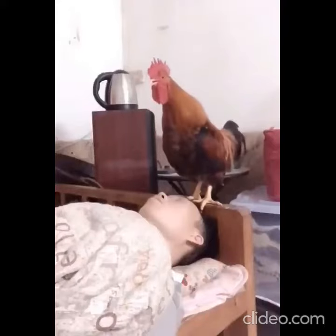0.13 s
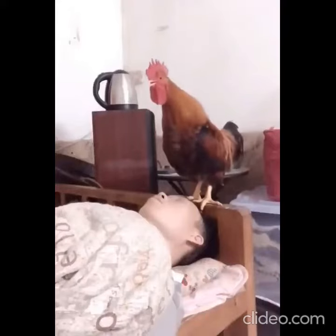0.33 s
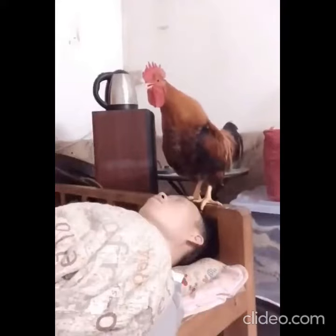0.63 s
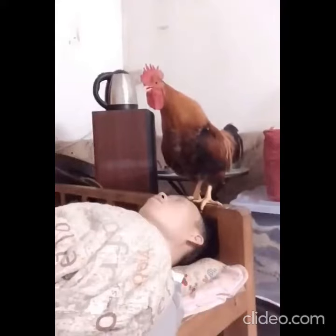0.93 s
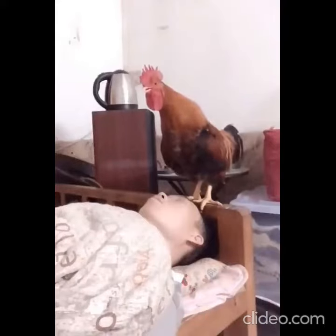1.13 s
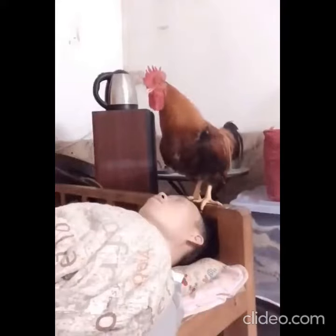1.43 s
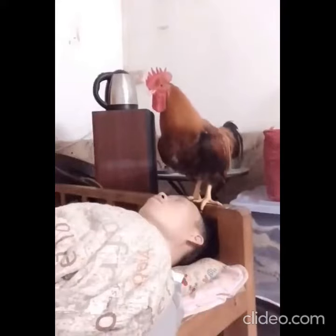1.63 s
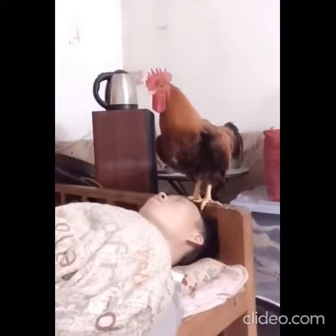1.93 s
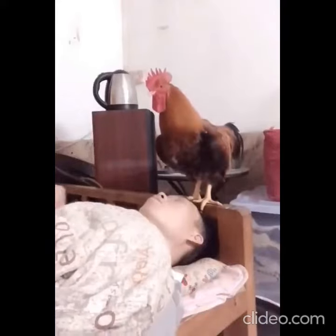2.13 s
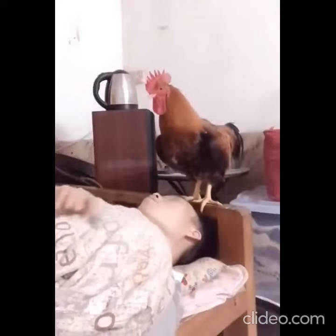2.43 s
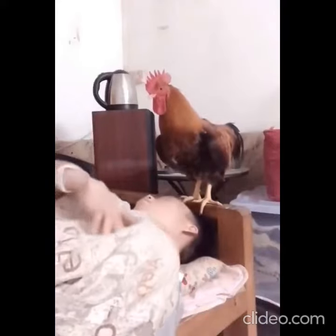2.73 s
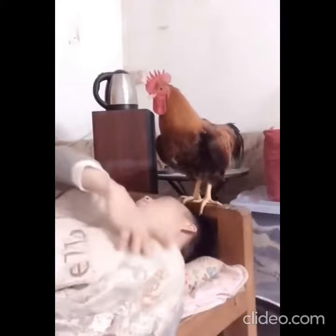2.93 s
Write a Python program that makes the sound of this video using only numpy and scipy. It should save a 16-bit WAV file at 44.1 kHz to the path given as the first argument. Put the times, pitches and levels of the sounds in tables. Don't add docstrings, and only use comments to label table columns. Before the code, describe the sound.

A rooster crows once, loud and close, hoarse syllables then a long clear note in a small room.

```python
import sys
import numpy as np
from scipy import signal
from scipy.fft import rfft, irfft, next_fast_len
from scipy.io import wavfile
from scipy.ndimage import uniform_filter1d, minimum_filter1d

SR = 44100
rng = np.random.default_rng(int(sys.argv[2]) if len(sys.argv) > 2 else 0)


def put_to_file(sound):
    columns = np.atleast_2d(sound).T
    safe = np.clip(columns, -1, 1)
    whole_steps = np.round(safe * 32767)
    wavfile.write(sys.argv[1], SR, whole_steps.astype(np.int16))


def field_ratio(decibels):
    return 10 ** (np.asarray(decibels, dtype=float) / 20)


N = 136710


def evened(x):
    return x / np.sqrt(np.mean(x ** 2) + 1e-20)


def read(points, hz):
    f, value = np.transpose(points)
    return np.interp(np.log(hz + 1), np.log(f + 1), value)


def shaped_noise(gain):
    return evened(irfft(rfft(rng.standard_normal(N)) * gain, N))


def drift(top_hz):
    hz = np.fft.rfftfreq(N, 1 / SR)
    return shaped_noise(1 / (1 + (hz / top_hz) ** 4))


# (time [s], pitch [Hz], roughness [0-1])
LEAD_IN = [
    (0, 605, .3),
    (.05, 600, .45),
    (.09, 600, .6),
]
FIRST_SYLLABLE = [
    (.1, 645, .4),
    (.125, 570, .7),
    (.16, 580, .5),
    (.178, 622, .2),
    (.255, 650, .25),
    (.278, 745, .4),
    (.3, 770, .3),
    (.32, 750, .45),
    (.336, 610, .4),
]
SECOND_SYLLABLE = [
    (.35, 593, .25),
    (.405, 607, .4),
    (.455, 652, .25),
    (.55, 690, .4),
    (.6, 658, .25),
    (.71, 650, .15),
    (.76, 626, .15),
    (.79, 622, .2),
    (.83, 505, .3),
]
CLIMB = [
    (.88, 440, .6),
    (.925, 445, .35),
    (.97, 510, .3),
    (.99, 545, .4),
    (1.008, 605, .2),
    (1.025, 619, .06),
    (1.095, 623, .03),
]
HELD_NOTE = [
    (1.106, 674, .05),
    (1.18, 686, .07),
    (1.22, 682, .04),
    (1.4, 684, .01),
    (1.62, 678, .015),
    (1.69, 676, .05),
    (1.73, 671, .03),
    (1.82, 652, .05),
    (1.9, 642, .03),
]
FALL = [
    (1.91, 586, .04),
    (1.98, 578, .03),
    (2.05, 565, .05),
    (2.075, 556, .2),
    (2.11, 545, .35),
    (2.16, 535, .5),
]


def pitch_and_roughness():
    s, hz, rough = np.transpose(LEAD_IN + FIRST_SYLLABLE + SECOND_SYLLABLE + CLIMB + HELD_NOTE + FALL)
    t = np.arange(N) / SR
    return np.interp(t, s, hz), np.interp(t, s, rough)


# (time [s], level [dB])
SHORT_EFFORT = [
    (0, -19),
    (.098, -28),
    (.108, -8.5),
    (.17, -14.5),
    (.31, -10),
    (.345, -16),
    (.43, -13),
    (.78, -11.5),
    (.89, -18.5),
]
LONG_EFFORT = [
    (.93, -19),
    (1.0, -4),
    (1.1, -12),
    (1.3, -9.5),
    (1.6, -9),
    (1.9, -12),
    (2.1, -12),
    (2.15, -14.5),
    (2.2, -75),
]
# (time [s], half length [s], level [dB])
CATCHES = [
    (1.69, 0.012, -7.5),
    (1.802, 0.0071, -13.5),
    (1.863, .01, -5),
]


def effort():
    t = np.arange(N) / SR
    db = np.interp(t, *np.transpose(SHORT_EFFORT + LONG_EFFORT))
    return db + sum(dip_db * np.exp(-((t - at) / w) ** 2) for at, w, dip_db in CATCHES)


def membranes(turns, hz, rough):
    t = np.arange(N) / SR
    half_from_s, half_to_s, half_ramp_s = 1.12, 1.88, 0.011
    split = np.clip(np.minimum(t - half_from_s, half_to_s - t) / half_ramp_s, 0, 1)
    half_db, half_rise_db = -16.5, 1.47
    folds = 0
    for k in range(1, 60):
        size = split * field_ratio(min(half_db + half_rise_db * k, 0)) if k % 2 else 1
        folds = folds + size * (k * hz < 31000) * np.cos(np.pi * k * turns + k * k / 9)
    flutter_db, flutter_hz = 6.5, 48
    return folds * field_ratio(flutter_db * rough * drift(flutter_hz))


# (time [s], half length [s], throaty level [dB], hissy level [dB])
RASPS = [
    (0.098, 0.054, -4, -28),
    (0.403, 0.025, -4.5, -16),
    (0.56, 0.15, -9.5, 3.5),
    (0.976, 0.026, -8.5, 4.5),
    (1.225, 0.0072, -14.5, -16),
    (1.704, 0.011, -25, -7),
    (1.98, 0.023, -43, -5),
    (2.14, 0.027, -30, -22),
]


def breath(turns, rough):
    t = np.arange(N) / SR
    puffs = (.3 + np.exp(-(turns % 1) / 0.9)) * rng.standard_normal(N)
    hiss_from_hz = 3800
    low = signal.sosfiltfilt(signal.butter(4, hiss_from_hz, fs=SR, output="sos"), puffs)
    swells = np.array([np.exp(-((t - at) / w) ** 2) for at, w, _, _ in RASPS])
    gusts = swells.T @ field_ratio(np.array(RASPS)[:, 2:])
    throaty_db, hissy_db, patchy_db, patchy_hz = -7, 2, 2, 4.7
    throaty = (field_ratio(throaty_db) * rough + gusts[:, 0]) * field_ratio(patchy_db * drift(patchy_hz)) * low
    hissy = (field_ratio(hissy_db) * rough + gusts[:, 1]) * field_ratio(patchy_db * drift(patchy_hz)) * (puffs - low)
    return throaty + hissy


def pipe(x, modes, gaps):
    size = next_fast_len(N + 8192)
    hz = np.fft.rfftfreq(size, 1 / SR)
    gain = np.sqrt(sum(field_ratio(2 * db) / (1 + (2 * (hz - f) / w) ** 2) ** 2 for f, w, db in modes))
    gap_db = sum(db * np.exp(-((hz - f) / w) ** 2 * 2) for f, w, db in gaps)
    chest_hz = 306
    chest = 1 / np.sqrt(1 + (chest_hz / (hz + 1)) ** 8)
    return irfft(rfft(x, size) * gain * field_ratio(gap_db) * chest, size)[:N]


# (frequency [Hz], width [Hz], level [dB])
BENT_MODES = [(679.6, 141, 1), (1465, 1064, -8.5), (1764, 130, -16.5), (2301, 110, -9), (3336, 325, -18.5),
              (4660, 306, -22), (5816, 160, -37), (7450, 1440, -30.5), (8860, 250, -29), (10120, 1400, -41),
              (12200, 4200, -48.5), (14500, 900, -50)]
STRAIGHT_MODES = [(680, 497, -1.5), (1458, 310, -1.5), (1707, 320, -7), (2115, 100, -11),
                  (3098, 140, -21.5), (4430, 600, -49), (5450, 334, -24.5), (6380, 290, -27.5),
                  (7370, 600, -37.5), (9270, 900, -43.5), (11070, 610, -42.5), (12800, 1100, -47),
                  (15100, 500, -48.5)]
# (frequency [Hz], width [Hz], level [dB])
BENT_GAPS = [(4180, 260, -22), (5450, 240, -20), (6300, 200, -18), (11000, 300, -10), (13700, 400, -10)]
STRAIGHT_GAPS = [(4010, 330, -13), (4910, 256, -35.5), (8160, 840, -0.5), (9600, 100, -19),
                 (13600, 800, -4)]


def rooster():
    t = np.arange(N) / SR
    hz, rough = pitch_and_roughness()
    wobble = .12 * drift(191.8) + .06 * drift(35.15)
    turns = np.cumsum(hz * (1 + rough * wobble)) / SR
    voice = np.sqrt(1 - 1.1 * rough ** 2) * membranes(turns, hz, rough)
    drive = field_ratio(effort()) * (voice + 4 * breath(turns, rough))
    stretch_s, stretch_ramp_s = 1.0, 0.05
    up = np.clip((t - stretch_s) / stretch_ramp_s + .5, 0, 1)
    bent = pipe(drive * (1 - up), BENT_MODES, BENT_GAPS)
    straight = pipe(drive * up, STRAIGHT_MODES, STRAIGHT_GAPS)
    return 2 * (bent + straight)


# (frequency [Hz], time to fall 60 dB [s])
WALLS_T60 = [(250, 0.5), (660, 0.61), (1740, 0.49), (4590, 0.69), (12000, 0.17)]
# (frequency [Hz], level [dB], time to fall 60 dB [s])
RINGING_TONES = [(332.6, -5.5, 0.28), (559, -27.5, 1), (626, -10, 0.91), (647, -12, 0.72), (689.4, -10.5, 0.36),
                 (1120, -11, 0.71), (1650, -8.5, 0.65), (1859, -3.5, 0.47), (2292, -26, 0.43)]


def walls(x):
    first_echo_s, size = .004, 2 * SR
    taps = np.zeros(size)
    at = np.arange(round(first_echo_s * SR), size - 20, 20)
    sign = rng.choice([-1., 1.], SR)[:len(at)]
    jitter = rng.integers(0, 20, SR)[:len(at)]
    taps[at + jitter] = sign
    hz, t, z = signal.stft(taps, SR, nperseg=256)
    fall_db = -60 * t / read(WALLS_T60, hz)[:, None]
    late_db, late_stretch = -19, 2.39
    decay = field_ratio(fall_db) + field_ratio(late_db + fall_db / late_stretch)
    tail = signal.istft(z * decay, SR, nperseg=256)[1][:size]
    t = np.arange(size) / SR
    rings = sum(field_ratio(db - 42 - 60 * t / t60) * np.cos(2 * np.pi * f * t) for f, db, t60 in RINGING_TONES)
    return signal.fftconvolve(x, tail / np.linalg.norm(tail) + rings)[:N]


# (frequency [Hz], level [dB])
HOUSE_AIR = [(30, -25), (100, -16.5), (300, -18), (600, -22), (1400, -27), (5000, -38), (9000, -51.5),
             (15000, -54)]
# (frequency [Hz], level [dB])
HUM = [(166.9, -54.5)]


def house():
    hz, t = np.fft.rfftfreq(N, 1 / SR), np.arange(N) / SR
    air = shaped_noise(field_ratio(read(HOUSE_AIR, hz)))
    rumble_hz, rumble_width_hz = 56, 36
    rumble = shaped_noise(1 / (1 + (2 * (hz - rumble_hz) / rumble_width_hz) ** 4))
    hum = sum(field_ratio(db - 1 + 0.57 * drift(36)) * np.sin(2 * np.pi * f * t) for f, db in HUM)
    air_db, swell_db, swell_hz = -46.5, 1.2, 6
    rumble_db, lump_db, lump_hz = -49, 5.5, 11.4
    air = field_ratio(air_db + swell_db * drift(swell_hz)) * air
    rumble = field_ratio(rumble_db + lump_db * drift(lump_hz)) * rumble
    return air + rumble + hum


def kettle():
    t = np.arange(N) / SR
    mode_hz, level_db, waver_db, waver_hz = 9129, -32.5, 3, 7
    from_s, rise_s, to_s, t60_s = 1.0, .012, 2.034, .5
    db = level_db + waver_db * drift(waver_hz) - 60 * np.maximum(t - to_s, 0) / t60_s
    return np.clip((t - from_s) / rise_s + 1, 0, 1) * field_ratio(db) * np.sin(2 * np.pi * mode_hz * t)


# (time [s], level [dB])
QUILT = [
    (2.3, -54.5),
    (2.58, -67),
    (2.64, -52),
    (2.78, -55),
    (3.1, -80),
]


def quilt():
    hz, t = np.fft.rfftfreq(N, 1 / SR), np.arange(N) / SR
    grains = rng.standard_normal(N) * field_ratio(1.3 * drift(40)) * (rng.random(N) < .15)
    cloth_hz, cloth_width_hz = 3020, 3100
    soft = irfft(rfft(grains) / (1 + (2 * (hz - cloth_hz) / cloth_width_hz) ** 2), N)
    return evened(soft) * field_ratio(np.interp(t, *np.transpose(QUILT)))


def scene():
    bird = field_ratio(4) * rooster()
    walls_db = -6
    return (bird + field_ratio(walls_db) * walls(bird) + kettle() + house() + quilt())[None]


def top_cut(x):
    return signal.sosfilt(signal.butter(12, 15400, fs=SR, output="sos"), x)


def record(dry):
    knee_db, squeeze, recover_db_per_s = -21.5, 0.44, 42
    power_db = 10 * np.log10(abs(uniform_filter1d(dry[0] ** 2, 2000)) + 1e-12)
    fall = np.arange(N) * recover_db_per_s / SR
    held_db = np.maximum.accumulate(power_db + fall) - fall
    over_db = np.maximum(held_db - knee_db, 0)
    x = dry / field_ratio(squeeze * uniform_filter1d(over_db, 800))
    peak = uniform_filter1d(-minimum_filter1d(-abs(x[0]), size=401), size=201)
    x = x / (1 + peak ** 4) ** .25
    return top_cut(x)


dry = scene()
out = record(dry)
put_to_file(out)
```